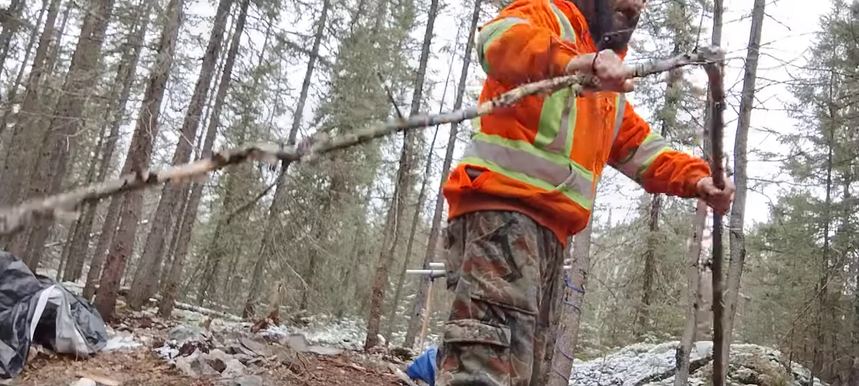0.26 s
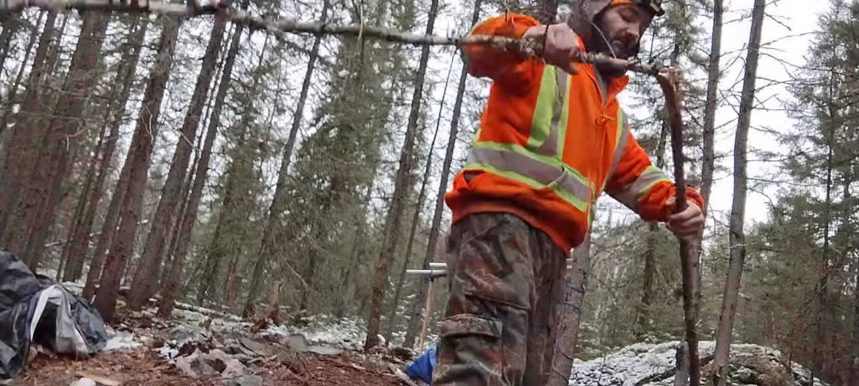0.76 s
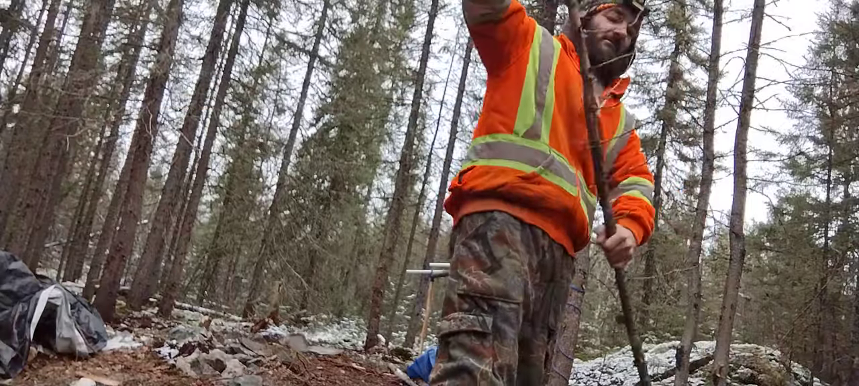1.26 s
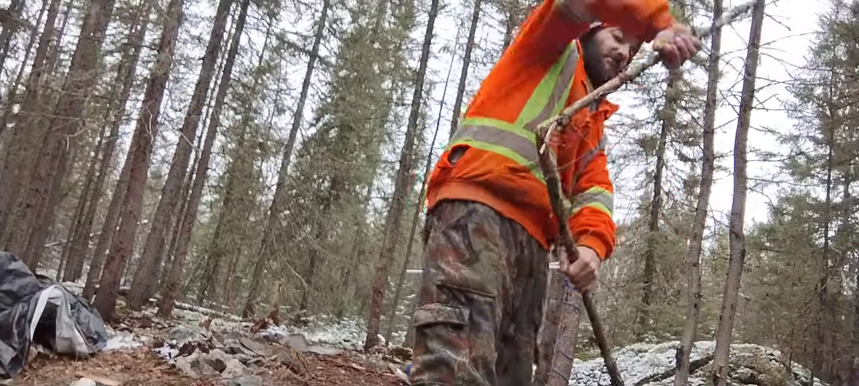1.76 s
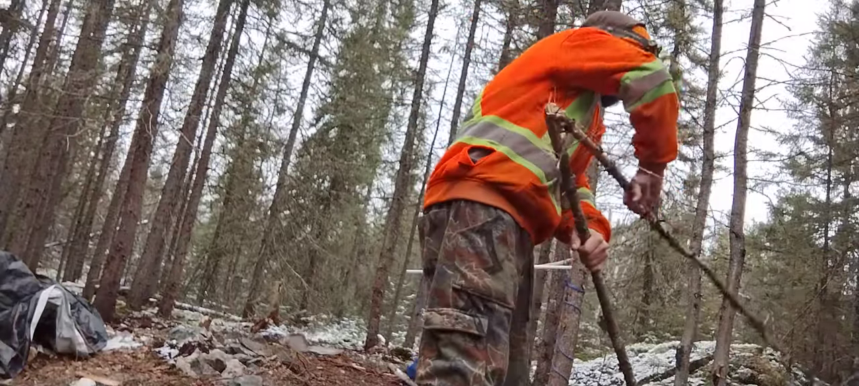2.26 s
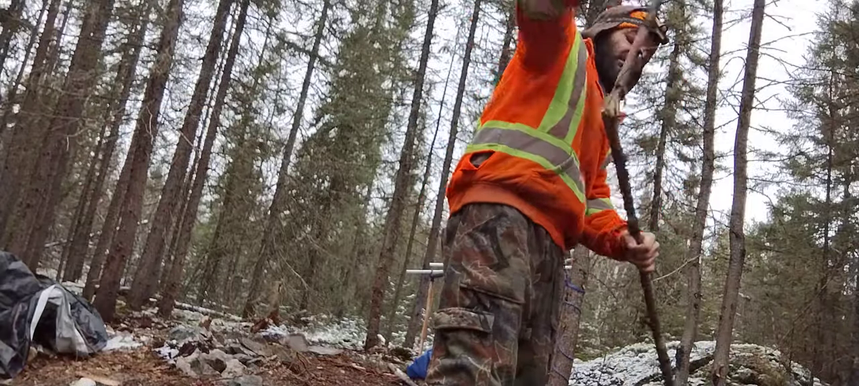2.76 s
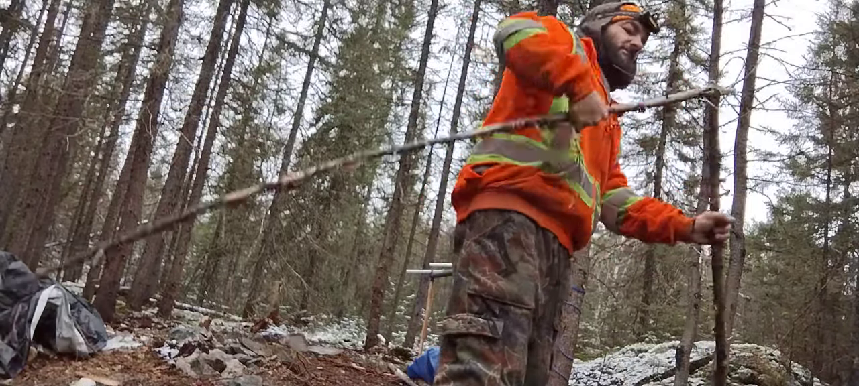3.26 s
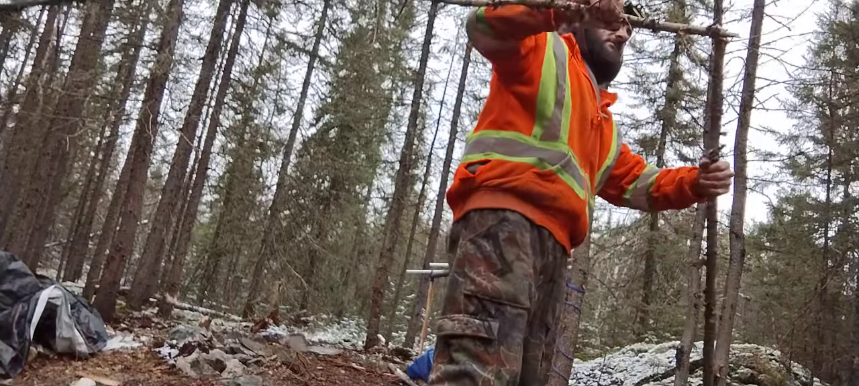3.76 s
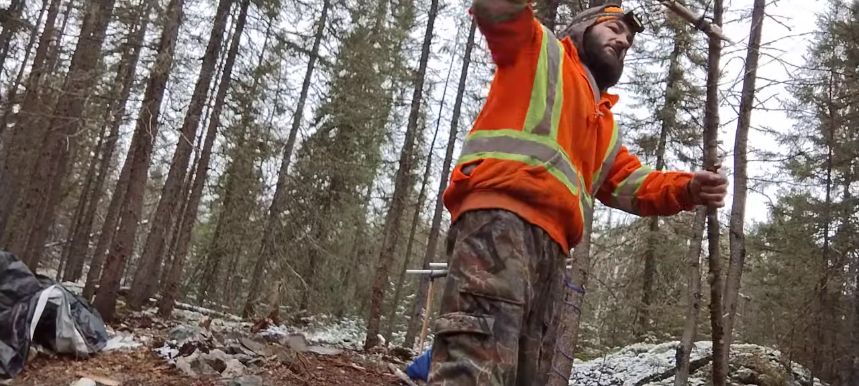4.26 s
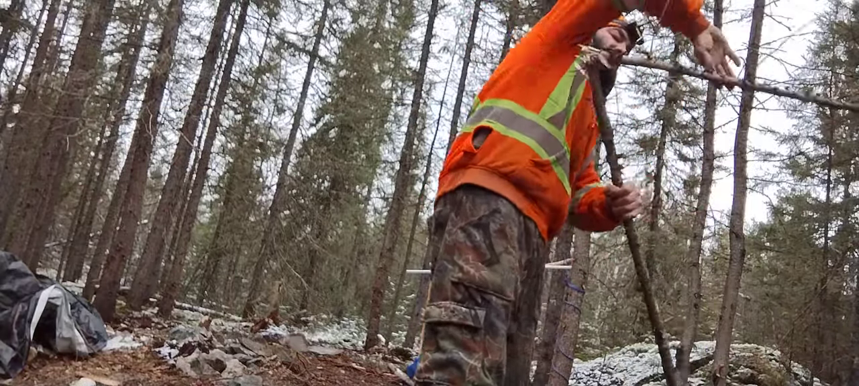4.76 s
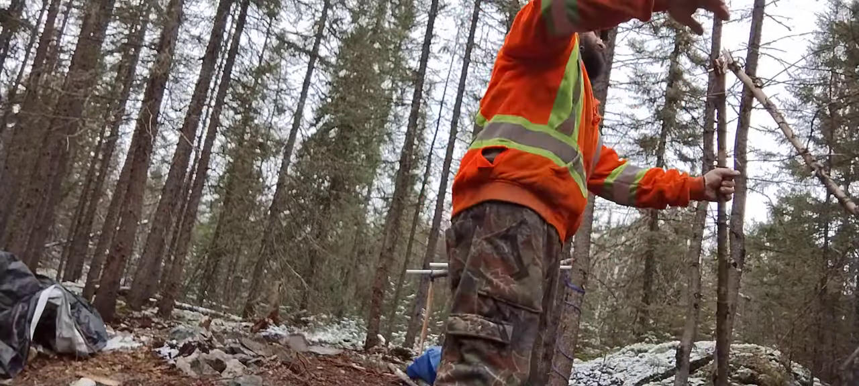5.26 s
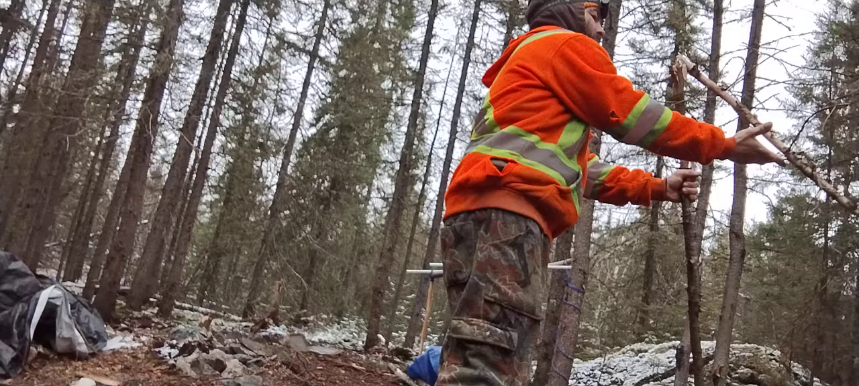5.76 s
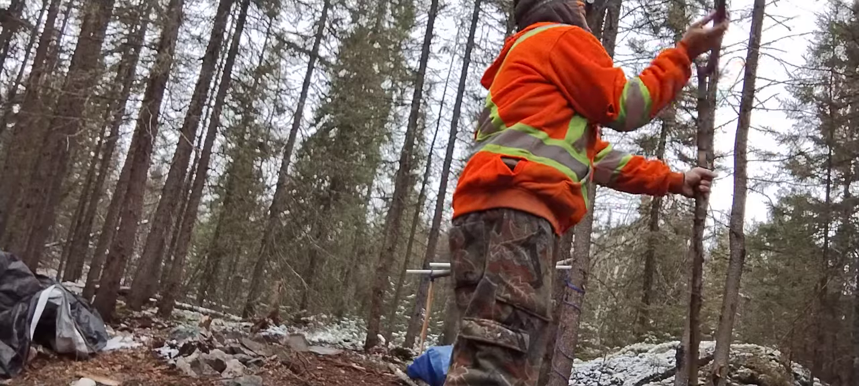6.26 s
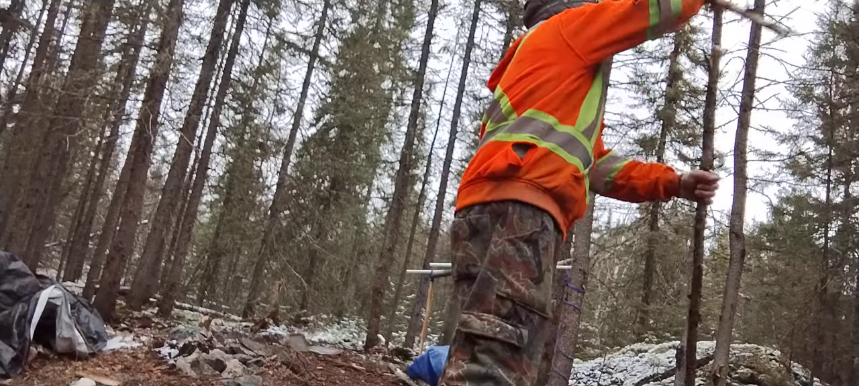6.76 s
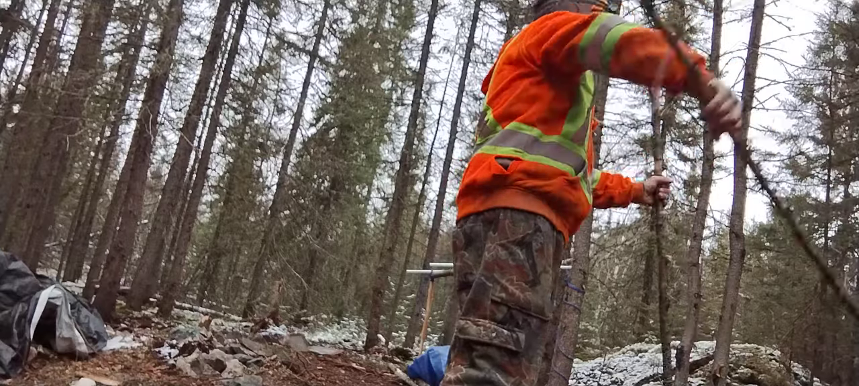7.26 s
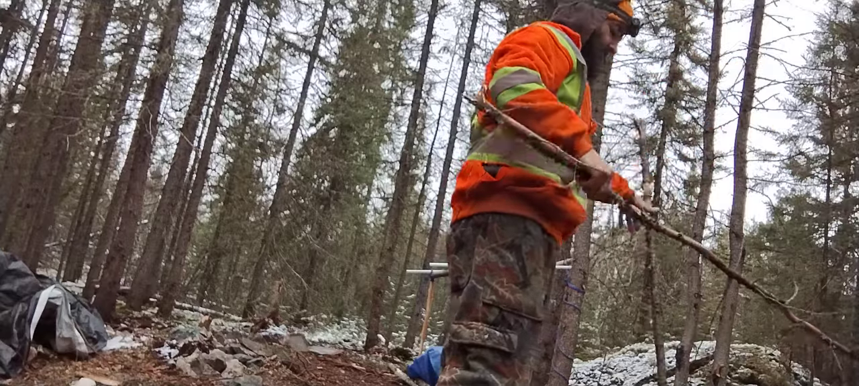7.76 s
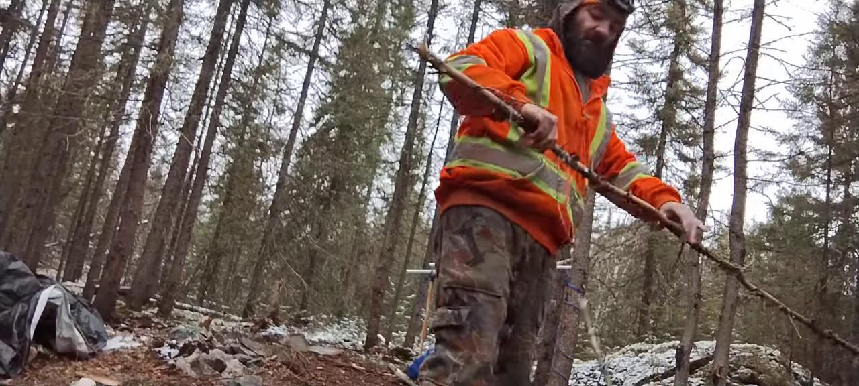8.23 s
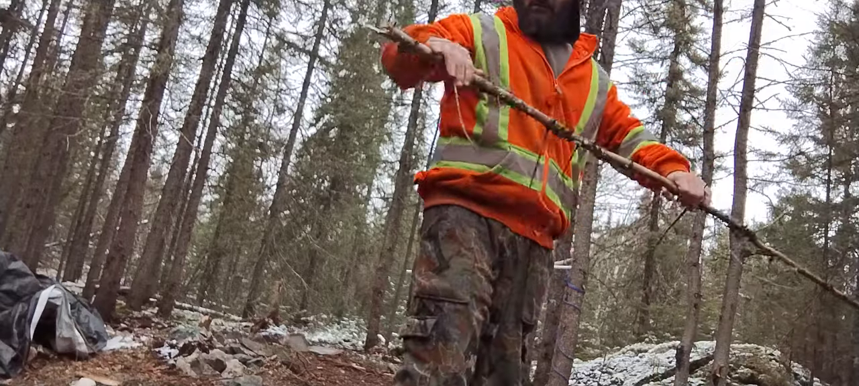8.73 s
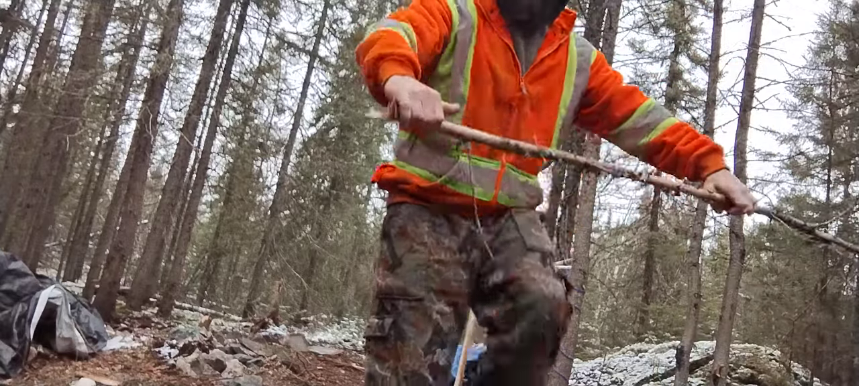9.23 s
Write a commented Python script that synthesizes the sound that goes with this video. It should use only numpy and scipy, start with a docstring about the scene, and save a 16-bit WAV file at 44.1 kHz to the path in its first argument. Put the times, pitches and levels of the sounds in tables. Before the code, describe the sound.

Dry branches are bent and torn by hand a few steps from a stereo microphone, among still trees. One loud snap opens, followed by a quick run of crisp cracks as the fibres give way. The loose end swishes, knocks and drags through ground litter between further bursts of splintering, while clothing and bark rustle softly. The cracking thins out to small twig scratches and two last knocks over a faint hiss of air.

```python
"""A quiet wood: dead branches are twisted and snapped by hand, a few steps from two spaced microphones.
Fibres creak, tear one after another and splinter; the wood rings when knocked and twigs flick free.
The loose end swishes, drags and crashes on the litter; sleeves and bark rustle.
Ground and trunks answer with two echoes and a short tail."""
import sys
import numpy as np
from scipy import signal
from scipy.io import wavfile
from scipy.ndimage import uniform_filter1d

SR = 44100
rng = np.random.default_rng(int(sys.argv[2]) if len(sys.argv) > 2 else 0)


def dump_mix(stems):
    """Bounce the given channels to the path in sys.argv[1] as a 16-bit WAV at rate SR."""
    frames = np.atleast_2d(stems).T  # one column per channel
    limited = np.clip(frames, -1, 1)  # hard clip at full scale
    pcm = np.round(limited * 32767).astype(np.int16)
    wavfile.write(sys.argv[1], SR, pcm)


N = 418509

# Pitch range of small fibres: low, high in Hz.
SMALL_FIBRE_HZ = (3800, 9210)


def gain_of(db):
    """Decibels to gain."""
    return 10 ** (np.asarray(db) / 20)


def unit_rms(x):
    """Scales to rms 1."""
    return x / np.sqrt(np.mean(x ** 2) + 1e-20)


def at_hz(points, hz):
    """Reads a table on a log-frequency axis."""
    points_hz, values = np.transpose(points)
    return np.interp(np.log(hz + 1), np.log(points_hz + 1), values)


def curve(rows, column):
    """One column of a timed table, at every sample."""
    rows = np.array(rows)
    return np.interp(np.arange(N) / SR, rows[:, 0], rows[:, column])


def add(mix, start_s, sound):
    """Mixes a sound in at a time."""
    part = mix[:, max(round(start_s * SR), 0):][:, :sound.shape[-1]]
    part += sound[..., :part.shape[1]]


def bandpass(x, low_hz, high_hz, passes=1):
    """Butterworth band-pass, steeper with each pass."""
    coeffs = signal.butter(2, [low_hz, high_hz], "band", fs=SR)
    for _ in range(passes):
        x = signal.lfilter(*coeffs, x)
    return x


def coloured(x, spectrum):
    """Minimum-phase filter from (Hz, dB) points; output at rms 1."""
    hz = abs(np.fft.fftfreq(4096, 1 / SR))
    log_gain = np.log(gain_of(np.maximum(at_hz(spectrum, hz), -100)))
    taps = np.fft.ifft(np.exp(np.conj(signal.hilbert(log_gain)))).real[:2048]
    return unit_rms(signal.oaconvolve(x, taps[None], axes=1)[:, :N])


def wander(noise):
    """Smooths noise to a slow drift of rms 1."""
    return unit_rms(uniform_filter1d(uniform_filter1d(noise, size=1500), size=1500))


def grains(length, per_s, spread_db, smooth, apart):
    """Uneven ticks over smooth noise; the channels differ more in the treble."""
    sizes = gain_of(spread_db * np.minimum(rng.exponential(1, length), 4))
    ticks = sizes * (rng.random(length) < per_s / SR)
    bursts = np.sqrt(signal.lfilter([1], [1, -.96], ticks ** 2))
    both, left, right = rng.standard_normal((3, length))
    return (unit_rms(bursts) + smooth) * (both + apart * bandpass([left, right], 900, 16000))


def air(rms_db=-66.5):
    """Still wood and microphone hiss: random short-time spectra with faint patches."""
    # Each row: frequency in Hz, noise density in dB.
    spectrum = [(15, -46.5), (25, -8.5), (105, -0.5), (296, -6.5), (584, -12), (687, -13), (809, -7.5),
                (2400, -14.5), (5130, -12), (13600, -28.5), (16500, -48.5)]
    # Each row: frequency in Hz, left-right correlation.
    correlation = [(60, 0.44), (640, 0.57), (1400, 0.025), (15000, 0.019)]
    frames, hz = N // 256 + 5, np.fft.rfftfreq(1024, 1 / SR)
    left_re, left_im, own_re, own_im, patches = rng.standard_normal((frames, 513, 5)).T
    patch_db = 2.2 * unit_rms(uniform_filter1d(uniform_filter1d(patches, 12, axis=0), 10, axis=1))
    same = at_hz(correlation, hz)[:, None]
    left = left_re + 1j * left_im
    right = same * left + np.sqrt(1 - same ** 2) * (own_re + 1j * own_im)
    spectra = np.array([left, right]) * gain_of(at_hz(spectrum, hz)[:, None] + patch_db)
    hiss = signal.istft(spectra, nperseg=1024, noverlap=768)[1][:, :N]
    return gain_of(rms_db) * unit_rms(hiss)


def reflections(x, tail_db):
    """Two echoes off ground and near trunks, then sparse scatter dying band by band."""
    # Each row: delay in seconds, left gain in dB, right gain in dB.
    echoes = [(.0032, -28.5, -10.5), (.0098, -19.5, -27)]
    # Each row: frequency in Hz, T60 of the tail in seconds.
    decay = [(250, 0.27), (700, 0.14), (1800, 0.24), (4600, 0.13), (12000, 0.019)]
    taps = np.zeros((2, 16000))
    arrivals = np.arange(60, 15980, 20) + rng.integers(0, 20, (2, 796))
    np.put_along_axis(taps, arrivals, rng.choice([-1., 1.], arrivals.shape), axis=1)
    hz, t, spectra = signal.stft(taps, SR, nperseg=128)
    spectra = spectra * gain_of(-60 * t / at_hz(decay, hz)[:, None])
    response = signal.istft(spectra, SR, nperseg=128)[1]
    response *= gain_of(tail_db) / np.linalg.norm(response[0])
    for delay_s, left_db, right_db in echoes:
        response[:, round(delay_s * SR)] += gain_of([left_db, right_db])
    return signal.fftconvolve(x, response, axes=1)[:, :N]


def handling(calm_db=-60):
    """Bark and sleeves crackle in uneven strokes; below calm_db the ticks melt into smooth rustle."""
    # Each row: time in seconds, level in dB.
    effort = [(0.0, -38.5), (0.12, -53.5), (0.82, -63), (1.19, -54.5), (1.9, -68), (2.32, -46.5),
              (2.51, -62), (2.93, -65), (3.2, -53), (3.8, -57), (4.2, -65), (4.5, -62.5), (4.89, -57),
              (5.2, -47.5), (5.34, -69), (6.63, -63), (7.3, -76), (7.58, -61), (8.01, -74.5), (9.01, -78.5),
              (9.49, -74)]
    # Each row: frequency in Hz, noise density in dB.
    spectrum = [(590, -6.5), (1000, -10), (2220, -2.5), (3760, -8), (4540, -8), (5950, -11.5),
                (12500, -8.5), (14200, -8), (16500, -41.5)]
    level_db = curve(effort, column=1)
    smooth = .6 * gain_of(1.5 * np.maximum(calm_db - level_db, 0))
    crackle = grains(N, per_s=150, spread_db=3.5, smooth=smooth, apart=.8) / (1 + smooth)
    strokes = gain_of(3 * wander(rng.standard_normal(N)))
    return gain_of(level_db + 3) * coloured(crackle * strokes, spectrum)


def swish(pole_width_hz=190):
    """Air sheds off the swinging end: gusty noise in a resonance that follows its speed."""
    # Each row: time in seconds, level in dB, pitch in Hz.
    swings = [(0.0, -49, 755), (0.03, -41.5, 750), (0.06, -67, 740), (0.16, -49, 700), (0.24, -56, 694),
              (0.66, -101, 660), (1.29, -68, 704), (2.19, -91, 536), (2.32, -59, 542), (2.7, -69, 537),
              (3.17, -49, 700), (4.15, -72, 775), (4.9, -61.5, 636), (5.8, -78.5, 600), (6.5, -68.5, 508),
              (7.24, -69.5, 583), (7.5, -60, 646), (7.9, -78, 535), (8.6, -63.5, 516), (9.49, -95, 554)]
    carrier = np.exp(2j * np.pi * np.cumsum(curve(swings, column=2)) / SR)
    pole = np.exp(-np.pi * pole_width_hz / SR)
    both, left, right, gusts = rng.standard_normal((4, N))
    noise = both + .56 * np.array([left, right])
    baseband = signal.lfilter([(1 - pole) ** 2], [1, -2 * pole, pole ** 2], noise / carrier)
    whoosh = (carrier * baseband).real * gain_of(2.2 * wander(gusts))
    return gain_of(curve(swings, column=1)) * unit_rms(whoosh)


def scrapes():
    """Drags and crashes in bark and litter: three bands of dense grains swell, hold and die away."""
    # Each row: start, hold and fall T60 in seconds, rms in dB, low and high edge in Hz.
    drags = [(0.138, 0.041, 0.042, -50.5, 496, 8600), (0.209, 0.015, 0.53, -35.5, 474, 9700),
             (0.545, 0.044, 0.051, -56, 624, 1280), (1.125, 0.064, 0.048, -42.5, 3230, 6600),
             (2.288, 0.031, 0.21, -27.5, 240, 2640), (2.302, 0.059, 0.26, -36, 87.5, 540),
             (2.461, 0.046, 0.11, -41, 382, 10300), (2.762, 0.45, 0.21, -56, 292, 2310),
             (3.094, 0.22, 0.085, -44.5, 313, 865), (3.201, 0.018, 0.35, -26.5, 574, 5300),
             (3.224, 0.042, 0.41, -47, 69.3, 311.5), (3.386, 0.53, 0.38, -57, 530, 1650),
             (3.527, 0.02, 0.13, -40, 600, 6000), (3.938, 0.18, 0.019, -50, 450, 2380),
             (4.919, 0.05, 0.21, -44, 5000, 6130), (4.918, 0.055, 0.1, -40.5, 8200, 8950),
             (5.189, 0.16, 0.051, -47, 1550, 14700), (6.11, 0.0066, 0.16, -37.5, 2200, 9000),
             (6.353, 0.11, 0.24, -58, 206, 735), (6.357, .12, 0.46, -52, 1170, 11300),
             (7.388, 0.097, 0.071, -51.5, 1370, 5600), (7.6, 0.14, 0.28, -59.5, 2980, 4700),
             (8.5407, 0.004, 0.065, -24.5, 203, 1580), (9.247, 0.054, 0.033, -62.5, 3520, 14200),
             (9.393, 0.0071, 0.065, -54, 1500, 2920)]
    out = np.zeros((2, N))
    for start_s, hold_s, t60_s, db, low_hz, high_hz in drags:
        rise_s = .0054 + .024 * hold_s
        t = np.arange(0, rise_s + hold_s + t60_s, 1 / SR)
        edges_hz = np.geomspace(low_hz, high_hz, 4)
        grit = sum(bandpass(grains(len(t), per_s=400, spread_db=4.5, smooth=.97, apart=1), *band_hz)
                   for band_hz in zip(edges_hz, edges_hz[1:]))
        fall_db = 60 * np.maximum(t - rise_s - hold_s, 0) / t60_s
        add(out, start_s, unit_rms(grit) * np.minimum(t / rise_s, 1) * gain_of(db - fall_db))
    return out


def creak(band_hz=(3180, 6370)):
    """Bent fibres stick and slip before a break: nearly even bursts of noise."""
    # Each row: time in seconds, mean slips per second, level in dB.
    strain = [(5.993, 410, -49), (6.045, 310, -52), (6.103, 350, -43)]
    times_s, slips_per_s, db = np.transpose(strain)
    t = np.arange(times_s[0], times_s[-1], 1 / SR)
    jitter = 1 + 3.6 * uniform_filter1d(rng.standard_normal(len(t)), size=150)
    cycles = np.cumsum(np.interp(t, times_s, slips_per_s) * jitter) / SR
    slips = np.exp(-(cycles % 1) / .52) * rng.standard_normal(len(t))
    out = np.zeros((2, N))
    add(out, t[0], gain_of(np.interp(t, times_s, db)) * unit_rms(bandpass(slips, *band_hz, passes=2)))
    return out


def twigs():
    """Small ticks, from weak fibre cracks and from twigs that catch and flick free: short scratches, each
    ringing a little at its own pitch."""
    # Each row: time in seconds, peak in dB, pitch in Hz.
    small_ticks = [(0.497, -43, 5720), (1.229, -28, 5030), (1.319, -28, 5470), (3.4274, -39, 5500),
                   (3.5058, -46, 5930), (3.5359, -33, 5340), (3.5514, -32, 3400), (3.617, -57, 5500),
                   (3.951, -37.5, 5040), (4.013, -35.5, 6250), (4.046, -33, 4400), (4.0764, -34, 5030),
                   (4.1698, -44, 9000), (5.0144, -42, 6500), (5.0337, -40, 4850), (7.392, -34.5, 3250),
                   (7.411, -45, 3960), (7.441, -36, 3050), (7.47, -40, 3550), (7.4944, -39, 3500),
                   (7.6181, -38.5, 3800), (7.638, -43, 4990), (7.7075, -40, 3810), (7.803, -49, 6000),
                   (7.8435, -43.5, 5340), (8.335, -44, 4600)]
    out, t = np.zeros((2, N)), np.arange(600) / SR
    for time_s, db, hz in small_ticks:
        both, left, right = rng.standard_normal((3, len(t)))
        scratch = t * np.exp(-t / .0011) * (both + .5 * np.array([left, right]))
        ring = unit_rms(bandpass(scratch, .824 * hz, hz / .816, passes=2))
        sound = ring + .8 * unit_rms(bandpass(scratch, *SMALL_FIBRE_HZ))
        add(out, time_s - .001, gain_of(db) * sound / abs(sound.mean(0)).max())
    return out


def jolts():
    """A big fibre lets go and the shaken branch gives one soft push of air."""
    # Each row: time in seconds, peak in dB.
    releases = [(0.0385, -32.5), (1.4191, -37), (1.5332, -38), (1.6634, -27), (1.8051, -24.5),
                (1.8759, -33), (1.8821, -24.5), (1.9852, -36), (2.1472, -28.5), (2.2944, -27), (3.259, -29),
                (4.8268, -36.5), (4.9418, -37.5), (8.5468, -20)]
    out, t = np.zeros((2, N)), np.arange(3000) / SR
    push = bandpass(t * np.exp(-t / .00021), 60, 720)
    for time_s, db in releases:
        add(out, time_s - .0008, gain_of(db) * push / abs(push).max())
    return out


def knocks():
    """A contact rings the modes of the wood; a thinner part rings higher."""
    # Each row: start in seconds, peak in dB, pitch factor, ring time factor.
    contacts = [(2.293, -24, 1.15, 2.2), (2.321, -17.5, 0.9, 0.5), (2.3, -26.5, 0.4, 0.7),
                (2.376, -29, 0.33, 0.7), (2.915, -33.5, 1.94, 0.44), (3.212, -26, 4.2, 1.1),
                (3.218, -19, 1.3, 0.62), (3.257, -22.5, 0.8, 0.23), (3.549, -28.5, 1.33, 0.97),
                (8.5437, -26, .92, 1.43), (8.788, -43.5, 1.04, 0.94), (9.4669, -19, 4.13, 0.2)]
    # Each row: base frequency in Hz, level in dB, base T60 in seconds.
    wood_modes = [(350, -11, 0.095), (554.4, 4, 0.093), (597, 2.5, 0.11), (696, 0, 0.097),
                  (1147, -1.5, 0.038), (1422, -16, 0.21)]
    out, t = np.zeros((2, N)), np.arange(6000) / SR
    hz, mode_db, t60_s = np.transpose(wood_modes)[:, :, None]
    for start_s, db, pitch, ring in contacts:
        # Where the blow lands sets each mode's sign and weight.
        weights = rng.choice([-1, 1], hz.shape) * gain_of(4.3 * rng.random(hz.shape))
        modes = weights * gain_of(mode_db - 60 * t / (t60_s * ring)) * np.sin(2 * np.pi * hz * pitch * t)
        sound = modes.sum(0) * (1 - np.exp(-t * pitch / .0008))
        add(out, start_s, gain_of(db) * sound / abs(sound).max())
    return out


def crack_schedule(spread_db=8, small_body_db=-24, small_splinter_db=-30):
    """Each bout of twisting sets the brightness of its clear cracks and scatters small ones."""
    # Each row: time in seconds, level in dB, relative body and splinter levels in dB, fibre pitch in Hz.
    clear_cracks = [(0.0083, -23, -7, -12.5, 4840), (0.0168, -10.5, -14, -27, 5400),
                    (0.022, -24, -5, -17.5, 4430), (0.0319, -14.5, -16.5, -30, 12300),
                    (0.04, -6, -15, -30, 5650), (0.186, -26, -12, -24, 11600),
                    (1.0131, -22.5, -13, -20.5, 5130), (1.057, -31, -8, -25, 4600),
                    (1.1085, -21.5, -6, -15, 4970), (1.1893, -25.5, -3.5, -30, 4800),
                    (1.2377, -19, 1.5, -30, 2970), (1.277, -11.5, -9, -29.5, 5770),
                    (1.3227, -21, -8, -38, 5960), (1.377, -22.5, -19, -46, 5200),
                    (1.4117, -18, -16, -17.5, 5770), (1.4209, -10, -23.5, -28, 5670),
                    (1.4783, -30.5, -11, -36.5, 6000), (1.527, -10.5, -17, -18.5, 12100),
                    (1.5333, -9, -9.5, -21, 5360), (1.5449, -21.5, -14, -9.5, 5400),
                    (1.6643, -8.5, -17, -19.5, 5000), (1.722, -34, -24, -40, 5800),
                    (1.8053, -9.5, -17, -20.5, 9630), (1.8753, -16, -16, -11.5, 5400),
                    (1.882, -20.5, 1.5, -36, 10600), (1.9405, -13.5, -18, -24, 5730),
                    (1.961, -18.5, -24, -11, 11100), (1.9846, -9, -20.5, -18.5, 6280),
                    (2.088, -30, -31, -13, 8200), (2.102, -26.5, -15, -8, 11400),
                    (2.147, -11, -14.5, -24, 4320), (2.2135, -27, -17, -32, 6200),
                    (2.244, -23.5, -12, -10, 5300), (2.3, -24.5, -3.5, 5, 4500),
                    (2.3745, -21.5, -5.5, -13, 12000), (2.7633, -37, -13.5, -5.5, 3180),
                    (2.8132, -31, -21, -20, 5950), (2.83, -32.5, -26, -31, 6300),
                    (2.873, -26.5, -25, -17, 6060), (3.0016, -19, -11, -26, 12700),
                    (3.018, -24.5, -11, -17, 5130), (3.0853, -27.5, -3, -12, 5270),
                    (3.118, -22.5, 1.5, -22, 3740), (3.1424, -30, -18, -27, 4750),
                    (3.1813, -22.5, -34, -17, 4900), (3.196, -20.5, -11, -25, 12800),
                    (3.2126, -21.5, 5, 1.5, 3070), (3.2571, -17, 2.5, -14.5, 2840),
                    (3.3355, -28.5, 0.5, -14, 5340), (3.441, -37, -4, -31, 2800),
                    (3.852, -29.5, -10, -18.5, 2970), (4.399, -27.5, -14.5, -23, 11600),
                    (4.438, -31, -11, -22, 12000), (4.4598, -23, -17, -18.5, 10300),
                    (4.531, -29.5, -19, -16.5, 10200), (4.6093, -25.5, -21, -23, 11500),
                    (4.677, -25, -27, -13, 9600), (4.686, -16, -13, -28, 12200),
                    (4.8255, -13, -7, -20.5, 13000), (4.9426, -14, -6.5, -25.5, 4750),
                    (4.975, -32, -29, -26, 9600), (4.9818, -30.5, -34, -23, 8150),
                    (4.9943, -27, -32, -21, 10000), (5.0057, -29, -33, -24, 9050),
                    (5.051, -29, -29, -22, 8800), (5.07, -24.5, -28, -27, 5370),
                    (5.0777, -26, -16, -20, 11800), (5.136, -16, -17.5, -19, 13200),
                    (5.1694, -32, -6, -10, 12000), (5.184, -13, -19, -25, 13600),
                    (5.3553, -38, -15, -29, 4900), (6.1048, -18, -17.5, -32, 4800),
                    (6.121, -18, -21.5, -20.5, 5070), (6.3452, -25, -13.5, -38.5, 5100),
                    (6.383, -35, -5, -35, 5340), (6.409, -25, -14, -15, 12500),
                    (6.4186, -24.5, -9, -15, 5430), (6.457, -24, -14, -27, 4220),
                    (6.471, -24.5, -11, -38, 4540), (6.5918, -33.5, -11, -11.5, 4860),
                    (6.6849, -21, -15, -11.5, 3170), (6.715, -17.5, -21, -21, 3120),
                    (6.774, -39, -11, -15, 3370), (6.782, -27.5, -13.5, -18.5, 4200),
                    (6.837, -38, -5, -4.5, 5530), (8.5446, -28, 5.5, -13.5, 4440),
                    (9.4662, -30.5, -15, -5, 2800)]
    # Each row: start and end in seconds, brightness in dB, small cracks per second, their level in dB.
    bouts = [(0, .2, -5.5, 2, -51), (1.02, 1.343, -4.5, 5.4, -37), (1.336, 2.279, -3, 14, -33.5),
             (2.299, 2.5, -11.5, 7.8, -38), (2.751, 3.2, -3, 22.5, -38.5), (4.389, 4.702, 0.5, 11.5, -42.5),
             (4.812, 5.199, -2.5, 12.5, -49), (5.869, 5.9, -34, 88, -46.5), (6.104, 6.895, -5.5, 5, -45)]
    starts_s, _, brights_db, _, _ = np.transpose(bouts)
    rows = [(time_s, db, brights_db[np.searchsorted(starts_s, time_s) - 1], body_db, splinter_db, hz)
            for time_s, db, body_db, splinter_db, hz in clear_cracks]
    for start_s, end_s, bright_db, per_s, small_db in bouts:
        count = round(per_s * (end_s - start_s))
        centres_db = [small_db, bright_db, small_body_db, small_splinter_db]
        for k, draw in enumerate(rng.random((20, 6))[:count]):
            levels_db = centres_db + spread_db * (2 * draw[1:5] - 1)
            hz = np.interp(draw[5], [0, 1], SMALL_FIBRE_HZ)
            rows.append((start_s + (k + draw[0]) / per_s, *levels_db, hz))
    return rows


def tear_envelope(t, snap_s, rise_s):
    """A fibre gives in jerks: four small slips around the main snap, then a brief tail."""
    slips_s = np.append(rng.uniform(0, 3 * snap_s, size=4), snap_s)[:, None]
    strengths = np.append(.3 * rng.random(size=4) ** 3, 1)[:, None]
    age = np.maximum(t - slips_s, 0) / rise_s
    pulses = strengths * age ** 2 * np.exp(2 - 2 * age)
    return pulses.sum(0) + .1 * (t > snap_s) * np.exp((snap_s - t) / .003)


def splinter_envelope(t, db, per_s=300, t60_s=.2):
    """Splintering after the snap: random lumps that die away."""
    sizes = gain_of(4 * np.minimum(rng.exponential(1, len(t)), 3))
    ticks = sizes * (rng.random(len(t)) < per_s / SR)
    lumps = unit_rms(uniform_filter1d(ticks, size=50)) + .45
    return unit_rms(lumps) * gain_of(db - 60 * t / t60_s) * (1 - np.exp(-t / .00061))


def cracks(lead_s=.004, treble_left_db=6):
    """A fibre tears in a millisecond burst coloured by its own pitch, then splinters on unevenly."""
    # Each row: low and high edge in Hz; the rows are snap, treble and body.
    bands_hz = [(3400, 8800), (9500, 14800), (700, 2800)]
    snap_hz, treble_hz, body_hz = bands_hz
    lean_db = treble_left_db * np.array([[.5], [-.5]])
    out = np.zeros((2, N))
    for time_s, db, bright_db, body_db, splinter_db, fibre_hz in crack_schedule():
        t = np.arange(4000 if db + splinter_db > -55 else 1200) / SR
        both, left, right = rng.standard_normal((3, len(t)))
        noise = both + 1.4 * np.array([left, right])  # each microphone sees another face of the break
        rise_s = rng.uniform(.0003, .0007)
        tear = noise * tear_envelope(t, lead_s, rise_s)
        splinter = noise * splinter_envelope(np.maximum(t - lead_s, 0), splinter_db)
        # Each row: band in Hz, gain in dB, splinter trim in dB. Light splinters shake the body less.
        layers = [(snap_hz, -3, 1), (treble_hz, bright_db + lean_db, 1.5), (body_hz, body_db, -4.5),
                  ((.8 * fibre_hz, 1.2 * fibre_hz), -2.5, -12)]
        sound = 0
        for band_hz, band_db, trim_db in layers:
            burst, debris = bandpass([tear, splinter], *band_hz, passes=2)
            crest = np.sqrt(2 * uniform_filter1d((burst ** 2).mean(0), size=24).max())
            sound = sound + gain_of(band_db) * (burst + gain_of(trim_db) * debris) / crest
        add(out, time_s - lead_s - 1.3 * rise_s, gain_of(db) * sound)
    return out


def scene():
    """The moving branch reaches one microphone a little before the other, over still air."""
    # Each row: time in seconds, left delay in milliseconds, left minus right level in dB.
    position = [(0, -0.23, -3.5), (1.9, -0.091, -0.45), (2.2, -0.38, 1.5), (2.75, -0.15, 0.5),
                (2.95, 0.46, -3.5), (4.15, 0.43, -2), (4.2, -.22, -0.5), (5.4, -0.21, 1.5), (6, -0.28, -1),
                (9.49, -0.093, 0.7)]
    branch = cracks() + twigs() + jolts() + knocks() + creak()
    scatter = reflections(bandpass(branch, 500, 16000), tail_db=-17)  # thin trunks return little bass
    near = branch + scatter + scrapes() + handling() + swish()
    lag_samples = np.round(curve(position, column=1) / 1000 * SR).astype(int)
    near[0] = near[0][np.clip(np.arange(N) - lag_samples, 0, N - 1)]
    balance = gain_of(curve(position, column=2) * [[.5], [-.5]])
    return near * balance + air()


def record(dry, low_cut_hz=60, ceiling=.9, edge_hz=16800):
    """Microphone bass loss, rounded peaks, treble shelf and band limit."""
    dry = signal.sosfilt(signal.butter(2, low_cut_hz, "high", fs=SR, output="sos"), dry)
    rounded = ceiling * np.tanh(dry / ceiling)
    shelf = signal.firwin2(255, [0, 13900, 14700, SR / 2], gain_of([0, 0, -20, -25]), fs=SR)
    edge = signal.firwin(511, edge_hz, window=("kaiser", 12), fs=SR)
    return signal.oaconvolve(rounded, np.convolve(shelf, edge)[None], "same")


dry = scene()
out = record(dry)
dump_mix(out)
```